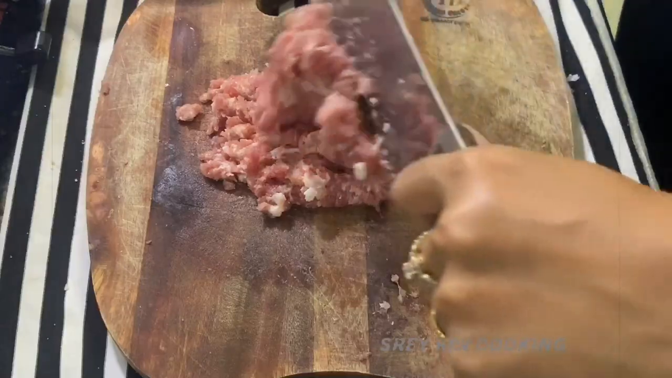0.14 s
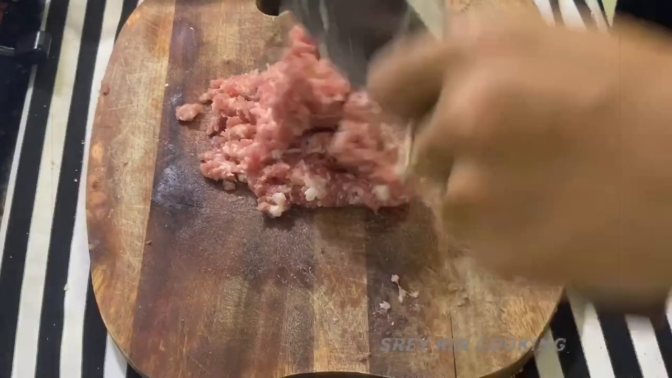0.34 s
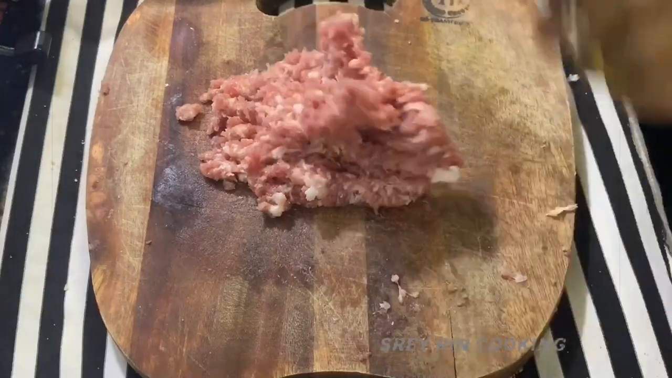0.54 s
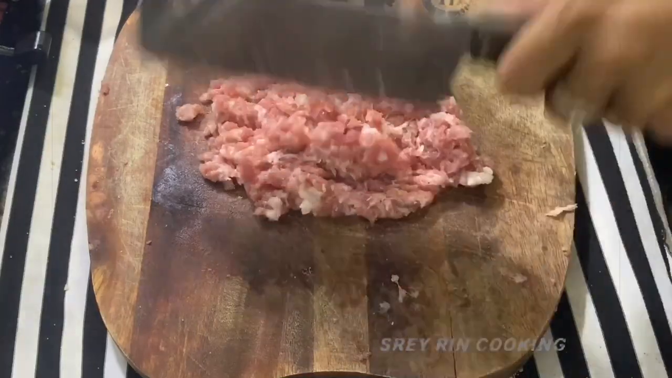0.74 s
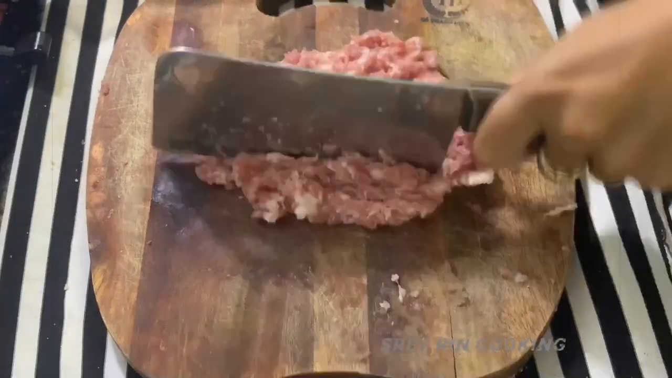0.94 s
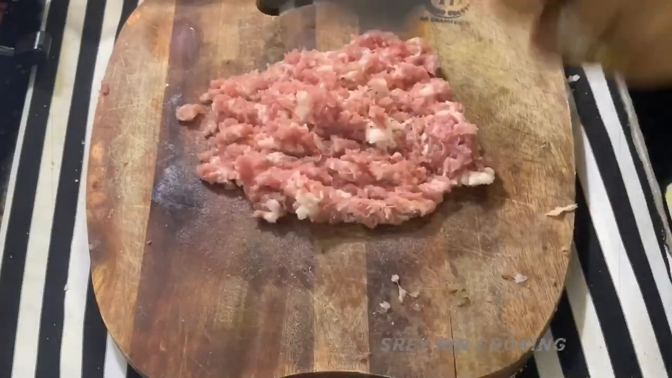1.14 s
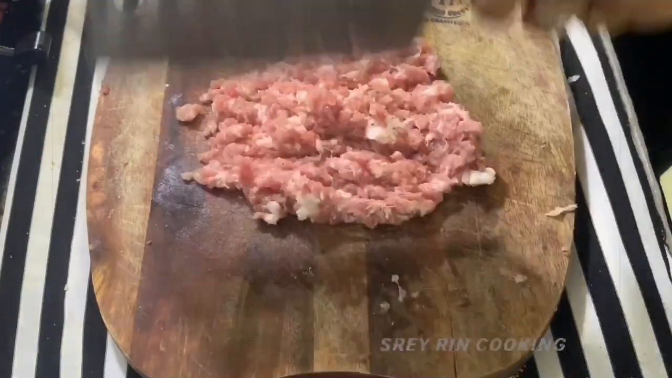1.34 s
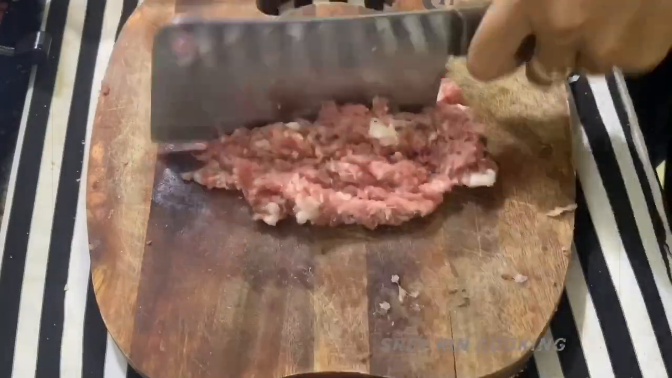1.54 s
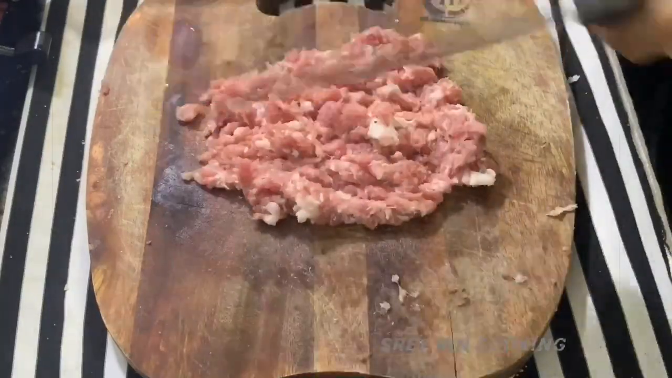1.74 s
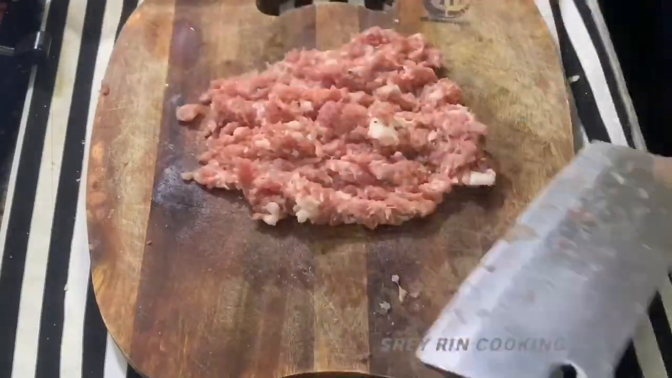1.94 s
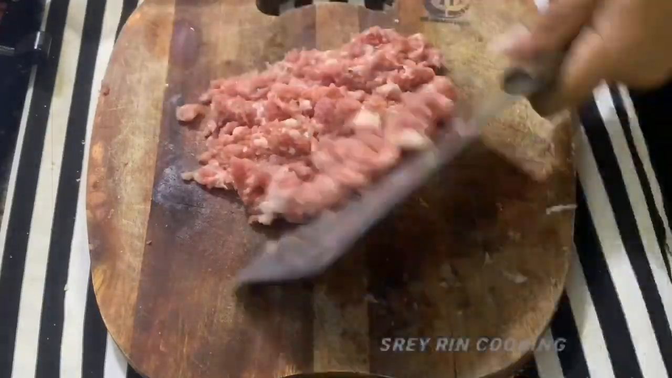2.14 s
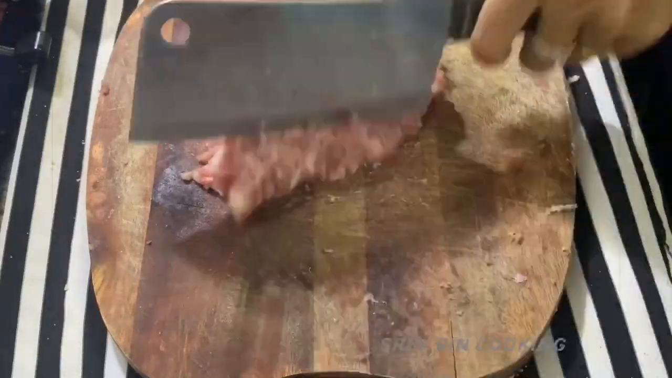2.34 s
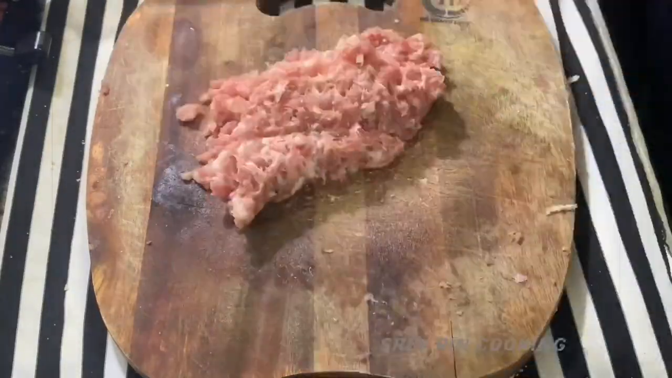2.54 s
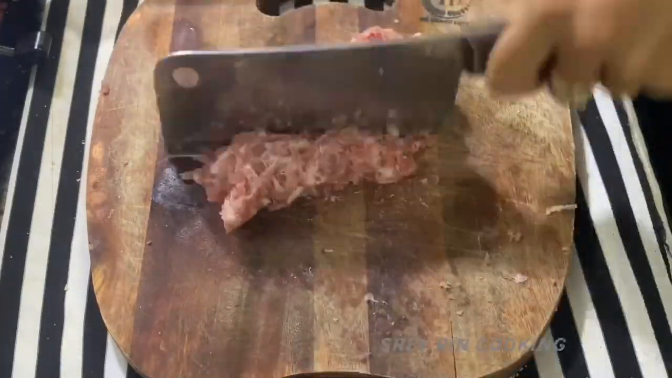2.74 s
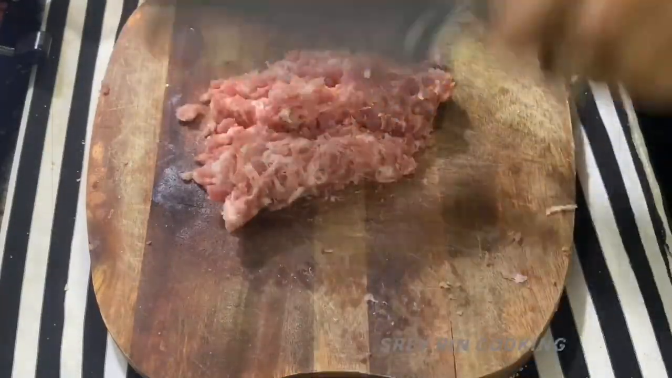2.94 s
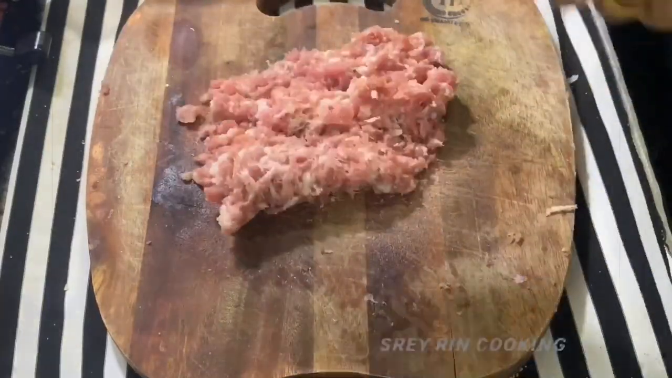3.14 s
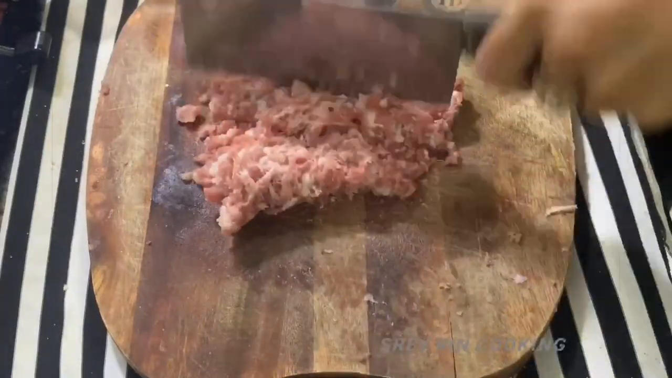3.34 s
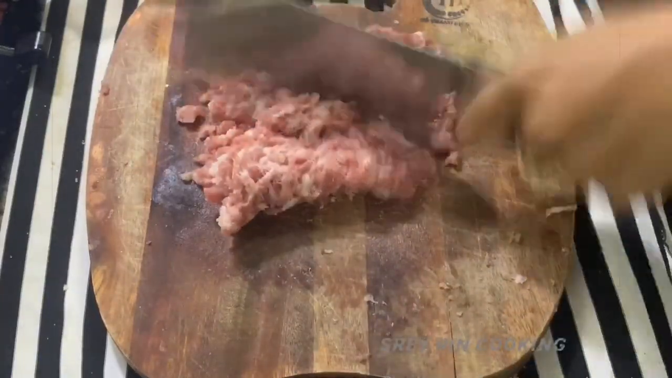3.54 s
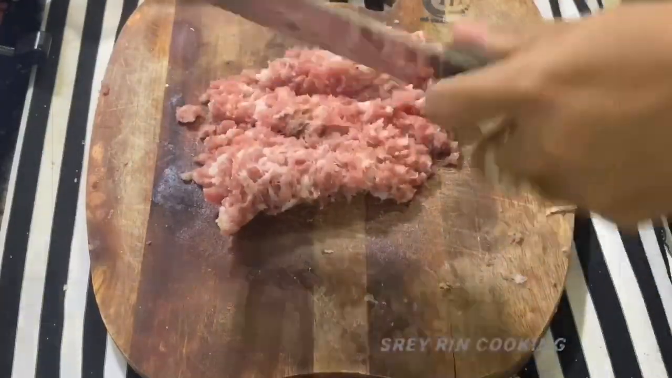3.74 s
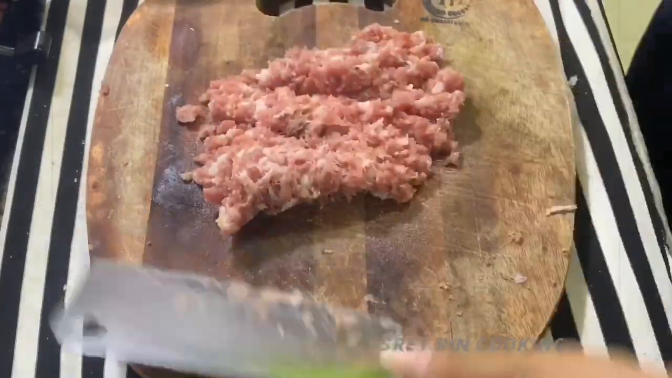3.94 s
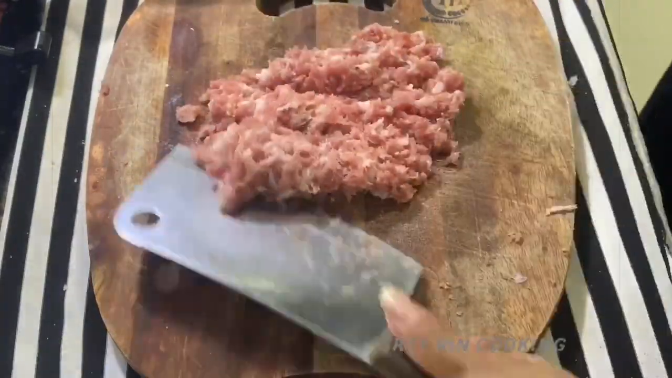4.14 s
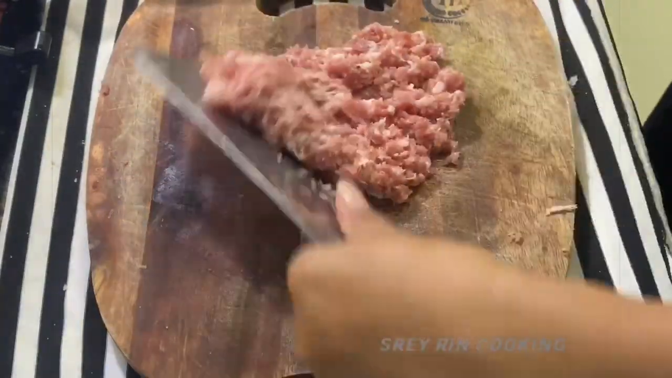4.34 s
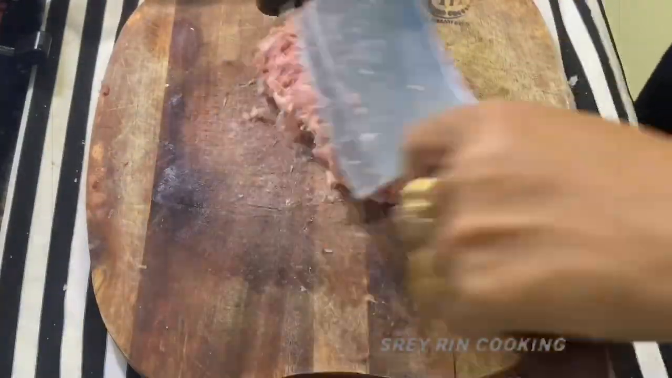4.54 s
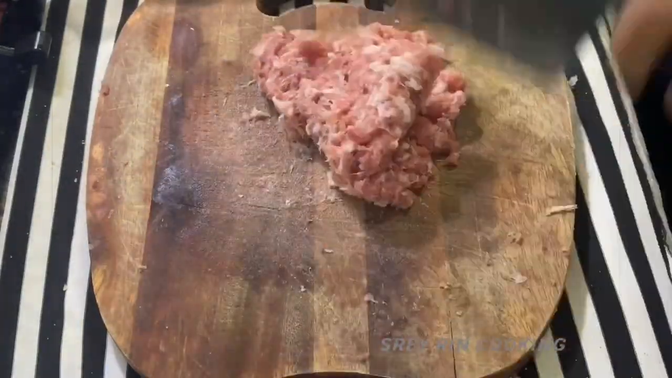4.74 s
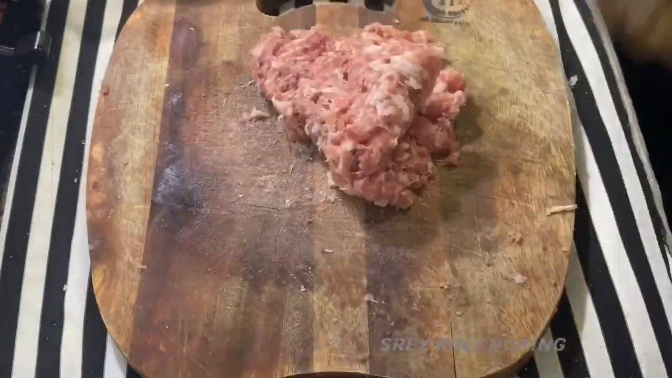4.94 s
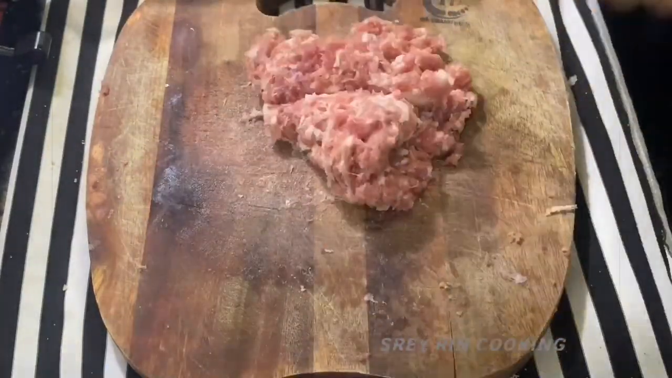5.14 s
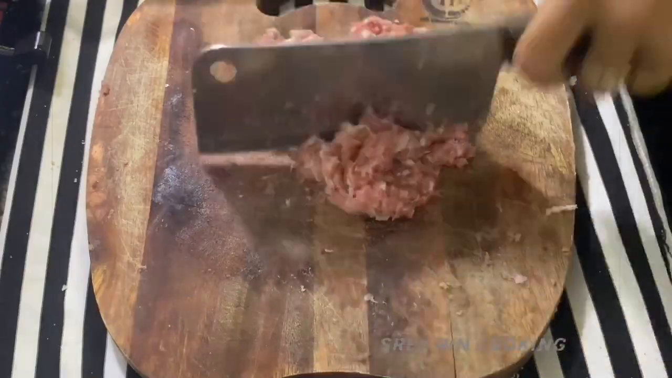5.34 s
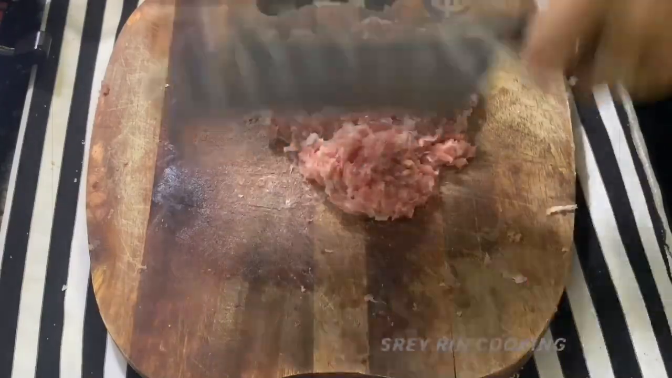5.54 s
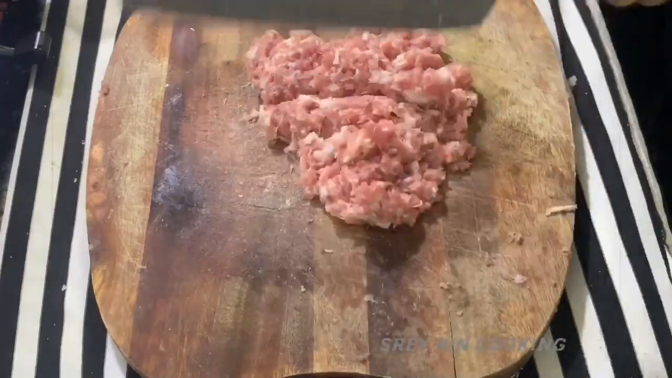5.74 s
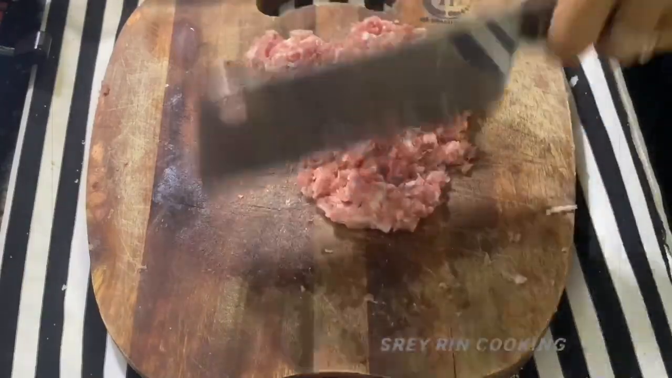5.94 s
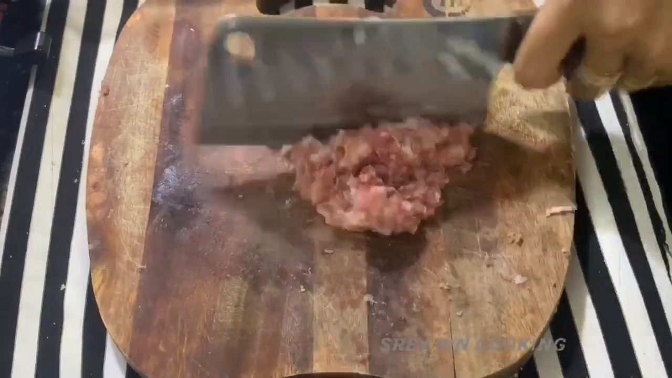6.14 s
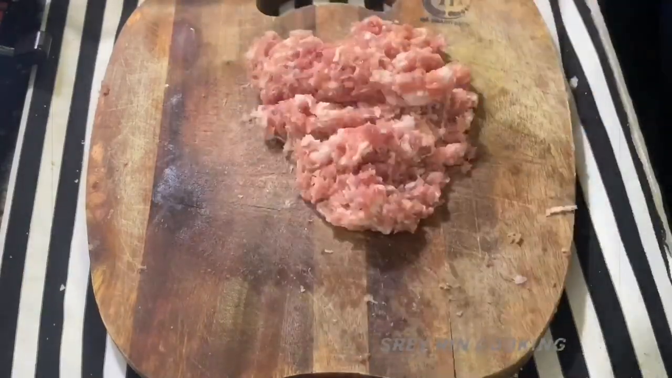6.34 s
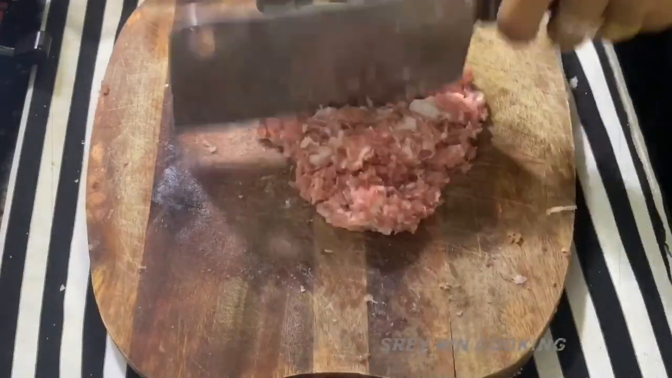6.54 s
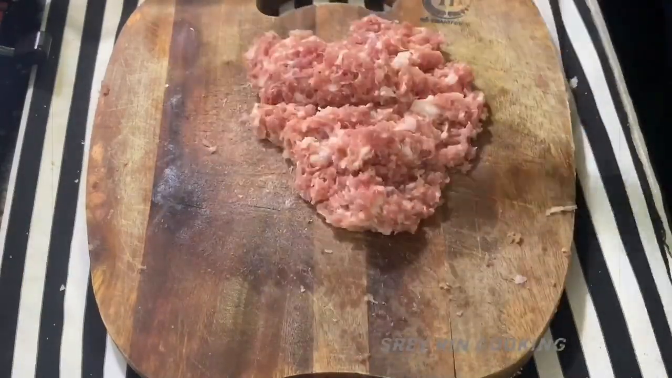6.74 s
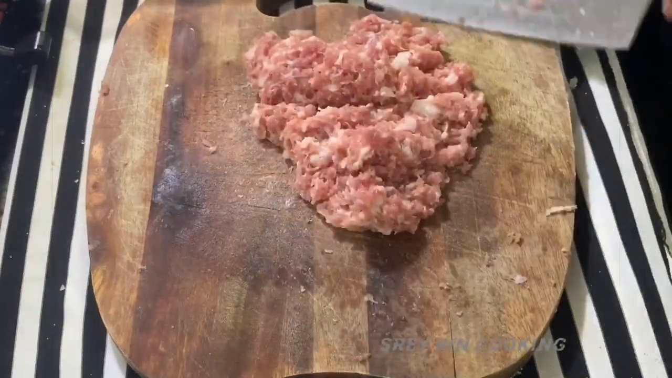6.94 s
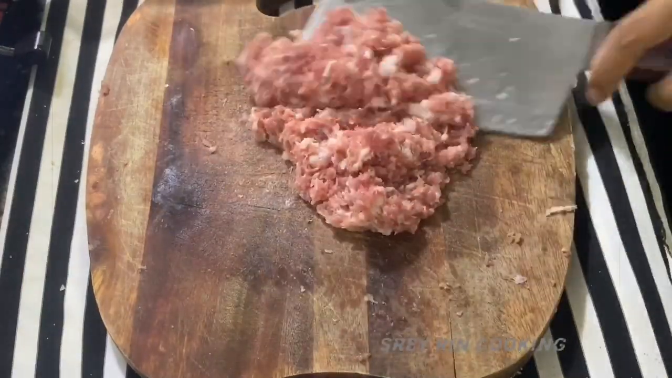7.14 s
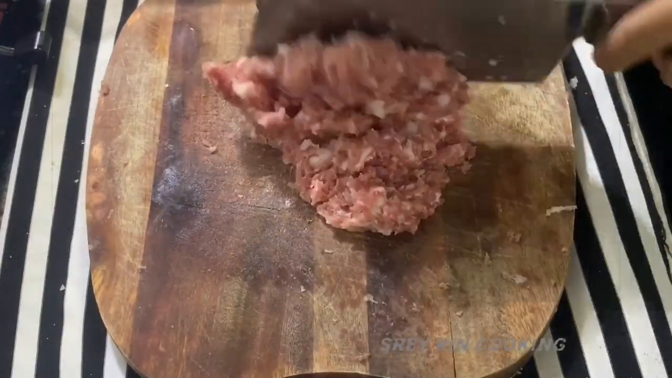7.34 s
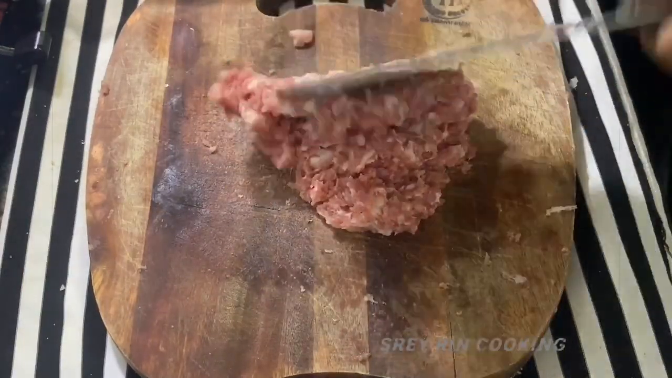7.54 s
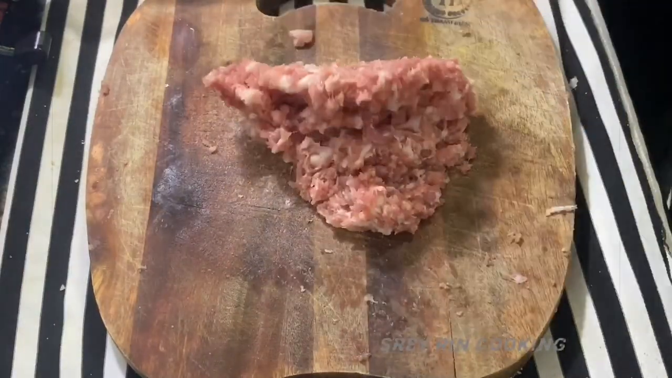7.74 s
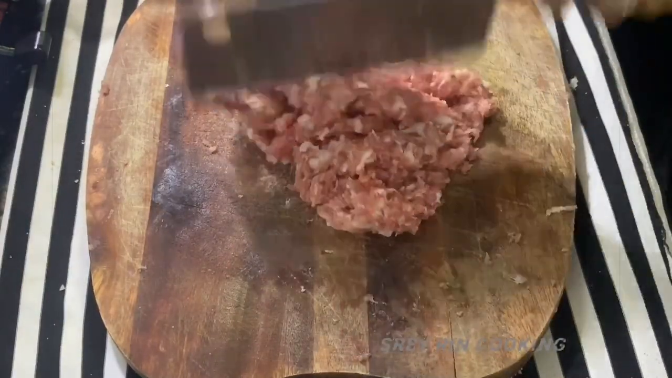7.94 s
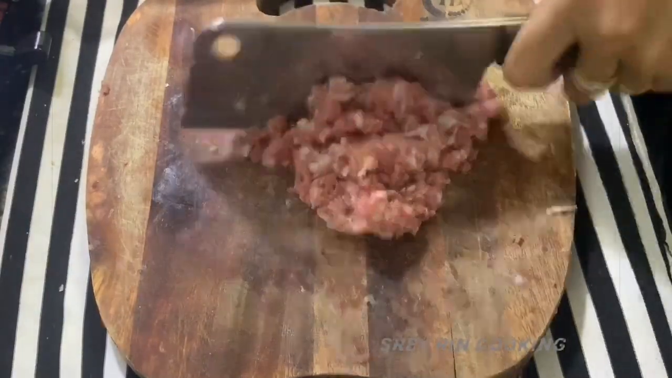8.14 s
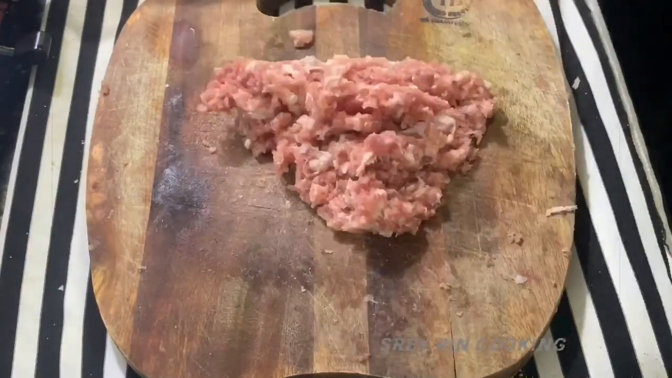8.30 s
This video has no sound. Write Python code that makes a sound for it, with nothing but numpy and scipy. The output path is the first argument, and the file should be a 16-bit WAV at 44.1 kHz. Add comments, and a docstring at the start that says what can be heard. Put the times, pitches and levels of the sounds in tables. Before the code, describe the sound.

A steel cleaver chops raw mince on a wooden board in steady runs of hard knocks, with metallic clacks and wet scrapes between runs.

```python
"""A quiet kitchen rumble and hiss come first, then small wet clicks; soon a cleaver minces meat on a board.
Each chop is a short rising noise, a knock made of the board's ringing modes, a squelch of grainy noise,
a faint ring of steel and a deep boom of table and room.
Between runs the flat blade clacks down (slap noise and ringing steel) and scrapes the mince together
(grainy noise through the blade's resonances). A small live kitchen echoes it all, close up in stereo."""
import sys
import numpy as np
from scipy import signal
from scipy.fft import rfft, irfft, next_fast_len
from scipy.io import wavfile
from scipy.ndimage import uniform_filter1d, minimum_filter1d

SR = 44100
rng = np.random.default_rng(int(sys.argv[2]) if len(sys.argv) > 2 else 0)


def put_to_file(sound):
    """Save the sound as 16-bit audio at rate SR, in the file named by the first command-line argument."""
    columns = np.atleast_2d(sound).T  # one column per channel
    safe = np.clip(columns, -1, 1)
    whole_steps = np.round(safe * 32767)
    wavfile.write(sys.argv[1], SR, whole_steps.astype(np.int16))


N = 373527


def amp(db):
    """Turn decibels into a gain."""
    return 10 ** (np.asarray(db) / 20)


def unit(x):
    """Scale a sound to an average strength (rms) of 1."""
    return x / np.sqrt(np.mean(x ** 2) + 1e-20)


def along(points, hz):
    """Read a curve of (frequency [Hz], value) points on a logarithmic frequency axis."""
    f, v = np.transpose(points)
    return np.interp(np.log(hz + 1), np.log(f + 1), v)


def filtered(x, response):
    """Change each frequency's strength and timing by a complex response."""
    n = x.shape[-1]
    padded = next_fast_len(n + 4096)
    hz = np.fft.rfftfreq(padded, 1 / SR)
    return irfft(rfft(x, padded) * response(hz), padded)[..., :n]


def coloured(x, spectrum):
    """Give a sound the spectrum's tone colour, at rms 1."""
    return unit(filtered(x, lambda hz: amp(along(spectrum, hz))))


def noise(spectrum, size):
    """Steady coloured noise of rms 1."""
    return coloured(rng.standard_normal(size), spectrum)


def grains(spectrum, size, spread_db):
    """Dense tiny snaps: noise whose strength jumps every 32 samples, at rms 1."""
    strength = np.repeat(rng.standard_normal(size // 32 + 1), 32)[:size]
    return coloured(rng.standard_normal(size) * amp(spread_db * strength), spectrum)


def fade(t, t60):
    """Smooth dying away that loses 60 dB in t60 seconds."""
    return np.exp(-np.log(1000) * t / t60)


def add(track, s, x):
    """Mix x into the track from time s on."""
    i = max(round(s * SR), 0)
    n = min(x.shape[-1], N - i)
    track[..., i:i + n] += x[..., :n]


# tone colours of the kitchen's low rumble and of its hiss: (frequency [Hz], relative level [dB per Hz])
RUMBLE_SPECTRUM = [(20, -36), (45, -5), (60, -3.5), (78, 0), (100, -2.5), (140, -8.5), (220, -21.5),
                   (500, -38.5), (2000, -67.5)]
AIR_SPECTRUM = [(30, -11.5), (200, -2.5), (450, -1.5), (800, -1), (1400, 0.5), (2300, -2), (3000, -14.5),
                (3900, -7.5), (5000, -18.5), (7000, -19), (12000, -25), (16000, -44)]


def background(rumble_db=-60, air_db=-67, rumble_pan_db=-5):
    """The kitchen's quiet rumble and hiss, steady noise drawn separately for left and right."""
    pan = amp(np.array([[rumble_pan_db], [-rumble_pan_db]]) / 2)
    rumble = amp(rumble_db) * pan * noise(RUMBLE_SPECTRUM, (2, N))
    return rumble + amp(air_db) * noise(AIR_SPECTRUM, (2, N))


# phase step between the microphone ports: (frequency [Hz], phase beyond the plain delay [radians])
PORT_PHASE_CURVE = [(100, 1.5), (250, 4), (400, 2.5), (540, 2.46), (900, 0), (1700, -0.66), (3400, -1.5),
                    (4300, -2), (6300, -1.49), (12000, -1)]
# level difference between the ports: (frequency [Hz], left minus right [dB])
PORT_BALANCE_CURVE = [(100, -6), (260, -11), (450, -2), (1200, 3), (2800, -6.5), (5000, 0)]
LEAD_S = .00017  # the plain delay between the ports


def ports(x):
    """Sound from the board reaches the two microphone ports out of step and unequally loud."""
    def response(hz):
        phase = along(PORT_PHASE_CURVE, hz) + 2 * np.pi * hz * LEAD_S
        half = amp(along(PORT_BALANCE_CURVE, hz) / 2) * np.exp(.5j * phase)
        power = (abs(half) ** 2 + abs(half) ** -2) / 2
        return np.array([half, 1 / half]) / np.sqrt(power)
    return filtered(x, response)


# how long the slower echo lasts: (frequency [Hz], time to fall 60 dB [s])
ROOM_DECAY = [(100, 0.94), (400, 0.68), (1000, 0.67), (2500, 0.89), (5000, 0.77), (8000, 0.27),
              (12500, 0.14)]
# tone colour of the echo: (frequency [Hz], relative level [dB])
ROOM_TONE = [(60, 2), (160, 3.5), (300, 1), (520, -2.5), (660, -3), (980, 4), (1500, 3), (2200, -4),
             (3600, -1.5), (5000, -1.5), (8000, -3.5), (12000, -12)]
# how alike left and right are: (frequency [Hz], correlation [-1 to 1])
ROOM_LIKENESS = [(80, 0.64), (250, -0.85), (650, -0.91), (1300, 0.085), (8000, 0)]


def kitchen(x, early_db=3, early_t60=0.18, build_s=0.0028):
    """Stereo echo made of fading noise: dense answers of nearby walls, then a slower tail."""
    hz, t, z = signal.stft(rng.standard_normal((2, SR * 3 // 4)), SR, nperseg=256)
    envelope = fade(t, along(ROOM_DECAY, hz)[:, None]) + amp(early_db) * fade(t, early_t60)
    envelope *= 1 - np.exp(-(t / build_s) ** 2)
    mid, side = z * envelope * amp(along(ROOM_TONE, hz))[:, None]
    # the mix of shared (mid) and opposite (side) sound sets the likeness
    turn = np.arccos(np.clip(along(ROOM_LIKENESS, hz), -1, 1))[:, None] / 2
    mid, side = mid * np.cos(turn), side * np.sin(turn)
    tail = signal.istft(np.array([mid + side, mid - side]), SR, nperseg=256)[1]
    return signal.fftconvolve(x[None], tail * amp(-42.5), axes=1)


# small wet clicks and crisp ticks, some just before a chop lands: (time [s], relative level [dB])
CLICK_EVENTS = [(0.2704, -55.5), (0.536, -53), (0.602, -35), (2.4345, -59), (2.6273, -53.5), (2.96, -43),
                (3.6335, -45.5), (4.0662, -39.5), (4.0879, -34), (7.5529, -50), (7.7811, -57.5),
                (8.0983, -52)]
# tone colour of wet meat, also used in the sounds below: (frequency [Hz], relative level [dB per Hz])
WET_SPECTRUM = [(1500, -11.5), (3300, 1), (4800, -0.5), (6900, -1.5), (8500, -5.5), (11500, -0.5),
                (13600, -7), (14700, -11.5), (16500, -24.5)]


def clicks(level_db=-7, t60=0.048):
    """Small wet clicks and crisp ticks: short fading bursts of noise."""
    out, t = np.zeros(N), np.arange(SR // 10) / SR
    for s, db in CLICK_EVENTS:
        add(out, s, amp(db + level_db) * fade(t, t60) * noise(WET_SPECTRUM, len(t)))
    return out


def pulse(gain):
    """The most compact wave that starts at once and has this strength at each frequency."""
    cepstrum = irfft(np.log(np.maximum(gain, 1e-6)))
    half = len(cepstrum) // 2
    cepstrum[1:half] *= 2
    cepstrum[half + 1:] = 0
    return irfft(np.exp(rfft(cepstrum)))


# the board's modes besides the main one: (frequency [Hz], relative level [dB], time to fall 60 dB [s])
BOARD_MODES = [(115, -13.5, 0.12), (286, -4.5, 0.032), (386.3, 1, 0.04), (498, -3, 0.072), (534, 4, 0.036),
               (656, -3, 0.025), (866, 1.5, 0.011), (1109, 1.5, 0.015), (1500, 0, 0.02), (1960, -2, 0.013),
               (2340, 1.5, 0.0094), (3100, -8, 0.0046)]


def knock(f, hardness_db, main_hz, main_db=5, main_t60=0.029, soft_hz=450, hard_hz=1800, most=1.4,
          scatter_db=2.0):
    """The board's modes answer one push; a cushioned blow reaches only the low ones."""
    hz, db, t60 = np.transpose([*BOARD_MODES, (main_hz, main_db, main_t60)])

    def reach(x):
        """How strongly hardness matters: 0 up to soft_hz, 1 at hard_hz."""
        return np.clip(np.log((x + 1) / soft_hz) / np.log(hard_hz / soft_hz), 0, most)

    size, place = rng.standard_normal((2, len(hz)))
    hz = hz * (1 + .03 * reach(hz) * place)  # the upper modes shift with where the blade lands
    width, col = np.log(1000) / (np.pi * t60), f[:, None]
    modes = amp(db + scatter_db * size) * col / (hz ** 2 - col ** 2 + 1j * col * width)
    modes = modes / np.sqrt(1 + (col / (2 * hz)) ** 4)  # each mode radiates little far above its pitch
    strength = np.linalg.norm(modes, axis=1) * SR / (2 * np.pi)
    return pulse(strength * amp(hardness_db * reach(f)))


def squelch(t, press_db=-53, press_t60=.3, lift_db=-62, lift_s=0.084, lift_width_s=0.012):
    """Wet mince is squeezed aside, then sucks at the blade as it lifts out, never twice alike."""
    timing, strength = rng.standard_normal(2) * [.25, 3]
    lift_offset = t - lift_s * np.exp(timing)
    lift = amp(lift_db + strength) * np.exp(-(lift_offset / lift_width_s) ** 2)
    return (amp(press_db) * fade(t, press_t60) + lift) * grains(WET_SPECTRUM, len(t), spread_db=3)


BEND_S = 0.00293  # sets how far the low waves lag behind the high ones


def bent(x):
    """Bending waves cross the board faster when high, so each knock is a quick downward chirp."""
    return filtered(x, lambda hz: np.exp(-2j * np.pi * BEND_S * (2 * np.sqrt(1000 * hz) - hz / 2)))


def ringing(modes, t, scatter_db=2):
    """Dying steel tones, new in strength for each blow, roughened by a random phase wander."""
    hz, db, t60 = np.transpose(modes)[:, :, None]
    gain = amp(db + scatter_db * rng.standard_normal(hz.shape))
    # the phase wanders in smoothed steps of 64 samples
    wander = np.cumsum(rng.standard_normal((len(hz), len(t) // 64 + 1)), axis=1) * .45
    wander = uniform_filter1d(np.repeat(wander, 64, axis=1)[:, :len(t)], size=256)
    return np.sum(gain * np.sin(2 * np.pi * hz * t + wander) * fade(t, t60), axis=0)


# deep resonances of table and room:
# (frequency before a small random shift [Hz], relative level [dB], time to fall 60 dB [s], left minus right [dB])
BOOM_MODES = [(54.8, -14.5, 2.4, -14), (72, -17, 1.2, -17.5), (93.7, 3.5, 0.22, -17),
              (107.2, -5.5, 1.3, -8.5), (114.74, 2.5, 0.49, -9), (160.6, -1.5, 0.68, -11),
              (256.6, -5.5, .35, -5.5)]


def boom(t, swell_s=0.016, drift=0.0091, stray=0.89):
    """Table and room swell into their deep resonances, a little differently each time."""
    ring = np.zeros((2, len(t)))
    for k, (hz, db, t60, pan) in enumerate(BOOM_MODES):
        phase = 2 * np.pi * hz * (1 + drift * rng.normal()) * t + stray * rng.standard_normal((2, 1))
        tone = np.sin(phase + [[np.pi / 2], [0]])
        level = amp(db + np.array([[pan], [-pan]]) / 2)
        ring += (-1) ** k * level * fade(t, t60) * tone
    ring *= 1 - np.exp(-t / swell_s)
    return ring / np.sqrt(np.mean(ring[:, :SR // 10] ** 2))


FIRM_DB = -12  # force of an ordinary firm chop
# rising noise before a firm, hard chop [dB], and what it gains per dB of force and of hardness [dB]
RISE_DB, RISE_PER_FORCE, RISE_PER_HARDNESS = -11, .77, .39
# boom of a firm chop [dB], and its gain per dB of force [dB]: even a cushioned blow shakes the table
BOOM_DB, BOOM_PER_FORCE = -31, .27
CHOP_ROOM_DB = -1.5  # the kitchen's answer to every chop
WALL_S, WALL_DB = .0135, -19  # the nearest wall's echo: delay, level
# tone colours of the rising noise, strongest around 850 Hz, and of the edge's tick:
# (frequency [Hz], relative level [dB per Hz])
RISE_SPECTRUM = [(100, -38), (500, -8), (850, 11.5), (1300, -7), (2500, -16.5), (5000, -24.5),
                 (12000, -48.5), (16000, -39)]
CRACK_SPECTRUM = [(200, 1.5), (600, 3.5), (1500, 10.5), (3000, 4.5), (5000, -6), (8000, -21),
                  (12000, -27.5), (16000, -34)]
# steel tones that ring on after a chop: (frequency [Hz], relative level [dB], time to fall 60 dB [s])
CLEAVER_MODES = [(790, -24, 1), (846, -26.5, 0.57), (995, -21.5, 0.43), (1036, -19, 0.26),
                 (1106, -27, 0.28), (1420, -32, 0.33), (1636, -24.5, 0.33), (1824, -30.5, .45)]
# chops; hardness is low when meat cushions the edge, the main mode depends on where the blade lands:
# (time [s], force [dB], hardness [dB], main board mode [Hz], relative level of the edge's tick [dB])
CHOP_EVENTS = [(0.6151, -20, -63.5, 695, -51), (0.9216, -9, -18.5, 803, -45.5),
               (1.202, -10.5, -3, 803, -37), (1.5024, -13.5, -13, 805, -39),
               (2.6864, -15, -21.5, 778, -40.5), (2.9719, -24, -49.5, 800, -49),
               (3.267, -10, -5.5, 854, -33), (3.5561, -10, -7.5, 847, -32), (5.005, -10, -11, 850, -42.5),
               (5.2863, -10, -10, 763, -34.5), (5.5746, -10.5, -9.5, 860, -47),
               (5.8512, -12, -0.5, 780, -34.5), (6.145, -10, -6, 706, -37.5),
               (6.4473, -11.5, -16, 836, -44.5), (7.847, -12.5, -9, 720, -46),
               (8.1435, -10.5, -6, 832, -32), (8.4412, -11, -12.5, 880, -32)]


def chops(rise_s=.022, rise_t60=0.035, entry_db=-48, entry_t60=0.044, knock_db=5.0, edge_db=34.0,
          crunch_db=11.5, crunch_t60=.0064, steel_db=-3):
    """A short rising noise leads into each knock; the edge ticks on the wood and the mince squelches."""
    out, t, long_t = np.zeros((2, N)), np.arange(8192) / SR, np.arange(SR) / SR
    f = np.fft.rfftfreq(len(t), 1 / SR)
    before = np.arange(round(rise_s * SR))[::-1] / SR  # time left until the knock
    tick = pulse(amp(along(CRACK_SPECTRUM, f)))
    for s, db, hardness_db, main_hz, tick_db in CHOP_EVENTS:
        extra_force = db - FIRM_DB
        rise_db = RISE_DB + RISE_PER_FORCE * extra_force + RISE_PER_HARDNESS * hardness_db
        boom_db = BOOM_DB + BOOM_PER_FORCE * extra_force
        rise = amp(rise_db) * fade(before, rise_t60) * noise(RISE_SPECTRUM, len(before))
        wet_entry = grains(WET_SPECTRUM, len(before), spread_db=9.0)
        rise += amp(entry_db) * fade(before, entry_t60) * wet_entry
        blow = amp(db + knock_db) * knock(f, hardness_db, main_hz)
        blow += amp(tick_db + edge_db) * tick
        # fibres crunch under the edge
        blow += amp(tick_db + crunch_db) * fade(t, crunch_t60) * noise(WET_SPECTRUM, len(t))
        blow += squelch(t)
        stroke = bent(np.concatenate([rise, blow]))
        start = s - len(before) / SR
        direct = ports(stroke)
        add(out, start, direct)
        add(out, start + WALL_S, amp(WALL_DB) * direct)
        add(out, start, amp(CHOP_ROOM_DB) * kitchen(stroke))
        steel = amp(db + hardness_db / 2 + steel_db) * ringing(CLEAVER_MODES, long_t)
        add(out, s, ports(steel))
        add(out, s, amp(boom_db) * boom(long_t))
    return out


# the flat blade set down; the decay scale shortens or lengthens both slap and ring:
# (time [s], relative level [dB], relative treble [dB], decay scale [s])
CLACK_EVENTS = [(1.917, -9, -25, 0.35), (1.998, -34.5, -22.5, 0.38), (3.971, -10.5, -28.5, 0.23),
                (6.947, -9, -39, 0.32)]
# ringing of blade on wood: (frequency [Hz], relative level [dB], time to fall 60 dB before choking [s])
STEEL_MODES = [(564, 3.5, 0.086), (1186, -0.5, 0.033), (1534, -14, 0.1), (2522, -17.5, 0.21),
               (3050, -46, 0.29), (3740, -26, 0.05), (3940, -28, 0.38), (7300, -18, 0.024),
               (7000, -41, 0.063), (9300, -36, 0.13)]
# tone colour of the slap: (frequency [Hz], relative level [dB per Hz])
SLAP_SPECTRUM = [(100, -7.5), (300, 3), (550, 13), (850, -1), (1400, 0), (2400, -6), (3400, -6),
                 (5000, -16), (8000, -23), (16000, -37)]


def clacks(ring_db=-16, crack_db=-13, tick_db=-3, attack_s=0.0003, slap_share=0.31):
    """The blade's flat meets the board: a slap and a short steel ring, choked by the meat."""
    out, t = np.zeros(N), np.arange(SR // 3) / SR
    for s, db, treble_db, t60 in CLACK_EVENTS:
        ring = amp(ring_db) * ringing(STEEL_MODES, t) * fade(t, 2 * t60)
        slap = amp(crack_db) * noise(SLAP_SPECTRUM, len(t))
        slap += amp(tick_db + treble_db) * noise(WET_SPECTRUM, len(t))
        attack = 1 - np.exp(-t / attack_s)
        add(out, s, amp(db) * (ring + slap * fade(t, slap_share * t60)) * attack)
    return out


STROKE_ATTACK_S, STROKE_RELEASE_T60 = 0.028, 0.22  # the blade bites in, and eases off at the end
STROKE_SAG_DB_PER_S = 10.5  # it slows as the mince piles up against it


def push(t, length_s):
    """Strength of one scraping stroke: attack, a slowly sagging hold, release."""
    held, after = np.clip(t, 0, length_s), np.maximum(t - length_s, 0)
    attack = np.clip(t / STROKE_ATTACK_S, 0, 1)
    return attack * amp(-STROKE_SAG_DB_PER_S * held) * fade(after, STROKE_RELEASE_T60)


# scraping strokes: (time [s], length before release [s], relative rasp on wood [dB], relative wet hiss [dB])
SCRAPE_EVENTS = [(1.958, .04, -39.5, -38.5), (2.031, .11, -58.5, -56.5), (2.205, .04, -74.5, -64),
                 (2.33, .14, -76.5, -70), (3.98, .04, -42, -59.5), (4.095, .06, -42, -49.5),
                 (4.184, .1, -38, -54), (4.348, .25, -67, -69), (4.621, .06, -64, -66),
                 (6.97, .06, -47, -54.5), (7.086, .19, -54, -60), (7.299, .17, -62.5, -73)]
# tone colour of steel rasping on wood: (frequency [Hz], relative level [dB per Hz])
RASP_SPECTRUM = [(120, -18.5), (300, 5.5), (450, 3), (1300, -1.5), (2100, -6), (3200, -12.5), (5000, -21.5),
                 (9000, -44)]
# resonances of the rubbed blade: (frequency [Hz], width [Hz], relative level [dB])
BLADE_RESONANCES = [(508.7, 110, 8), (1197, 54, 0.5), (1880, 97, 3), (3030, 31, 0), (3860, 90, 4),
                    (6220, 86, 6), (6700, 88, 7), (7000, 61, 4.5), (7420, 57, 8.5), (10900, 150, 2.5),
                    (13110, 100, 5.5)]


def scrapes(rasp_db=-2, hiss_db=-1, grip_db=2.0):
    """The edge sticks and slips over the grain, sings faintly and smears wet mince along."""
    on_wood, on_meat, t = np.zeros(N), np.zeros(N), np.arange(N) / SR

    def blade(f):
        """The plain sound plus each resonance of the blade."""
        peaks = (amp(db) * 1j * f * w / (c * c - f * f + 1j * f * w) for c, w, db in BLADE_RESONANCES)
        return 1 + sum(peaks)

    # the grip wanders between 90 random strengths per second
    grip = amp(grip_db * np.interp(t * 90, np.arange(2000), rng.standard_normal(2000)))
    rasp = unit(filtered(grip * grains(RASP_SPECTRUM, N, spread_db=4.0), blade))
    hiss = unit(filtered(grip * grains(WET_SPECTRUM, N, spread_db=4.0), blade))
    for s, length_s, wood_db, wet_db in SCRAPE_EVENTS:
        stroke = push(t[:SR], length_s)
        add(on_wood, s, amp(wood_db + rasp_db) * stroke)
        add(on_meat, s, amp(wet_db + hiss_db) * stroke)
    return rasp * on_wood + hiss * on_meat


def scene(wet_db=-2):
    """Chopping and gathering over the kitchen's quiet rumble and hiss."""
    floor = background()
    gathering = clicks() + clacks() + scrapes()
    gathering_echo = amp(wet_db) * kitchen(gathering)[:, :N]
    return floor + chops() + ports(gathering) + gathering_echo


TOP_HZ = 16100  # nothing is kept from here up


def record(dry):
    """A fast limiter holds the knocks under full scale; the band ends steeply."""
    needed = np.minimum(1, .92 / (abs(dry).max(axis=0) + 1e-9))
    gain = uniform_filter1d(minimum_filter1d(needed, size=60), size=60)
    return filtered(dry * gain, lambda hz: hz < TOP_HZ)


dry = scene()
out = record(dry)
put_to_file(out)
```